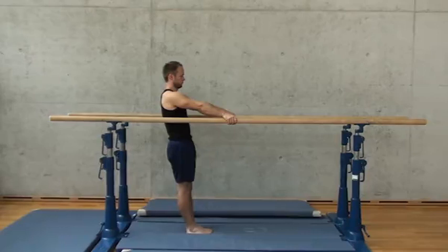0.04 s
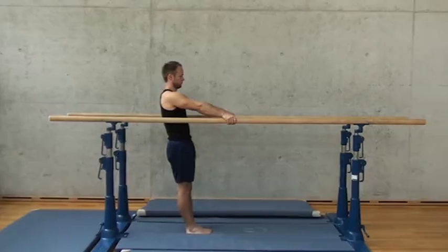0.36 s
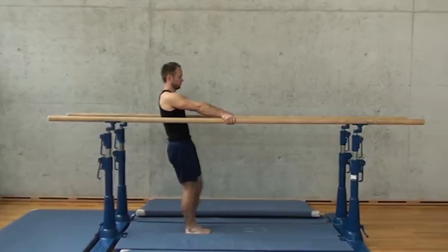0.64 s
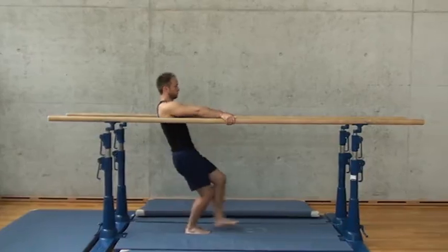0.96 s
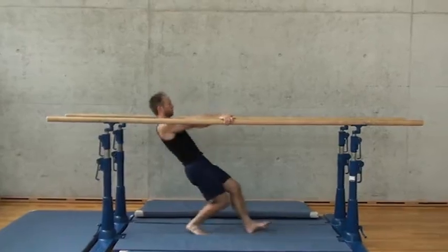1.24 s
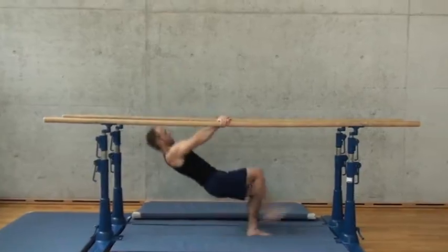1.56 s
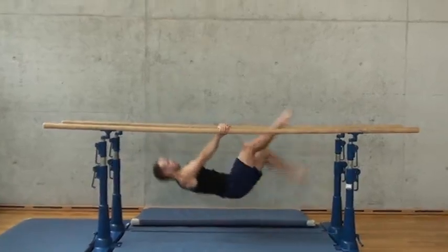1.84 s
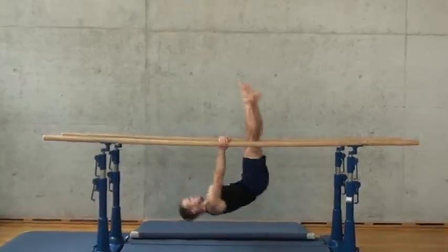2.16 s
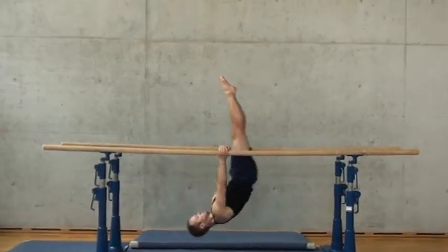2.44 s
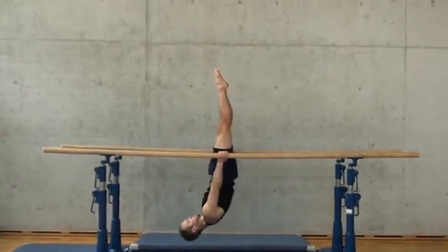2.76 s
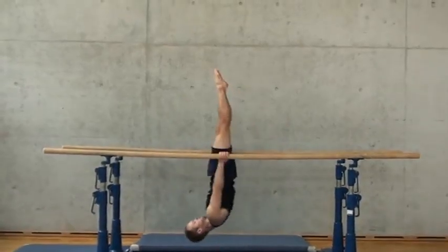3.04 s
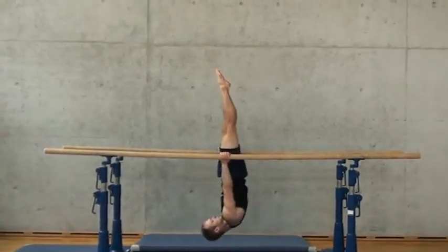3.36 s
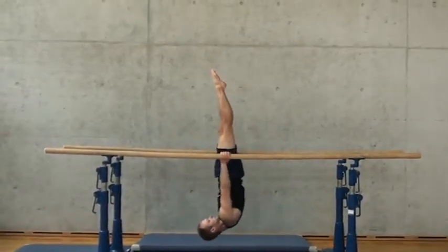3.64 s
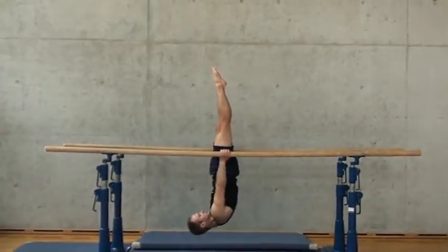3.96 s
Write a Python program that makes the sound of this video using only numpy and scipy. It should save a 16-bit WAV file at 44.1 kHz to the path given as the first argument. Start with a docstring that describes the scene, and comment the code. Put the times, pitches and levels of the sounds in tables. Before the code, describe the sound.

Short thump of a foot on a mat, with a swish and soft knocks.

```python
"""A gymnast swings under wooden parallel bars: a bare foot scuffs and pats the vinyl mat,
then feet and shorts swish as the legs kick up. Rubbing is a hiss with tiny slips in it,
and each pat is a dull thud of foam plus a bright slap of skin, both short bursts of noise.
The mat and the loaded bars knock and rumble softly, and the gym's concrete walls echo.
Behind it all are steady ventilation and a faint electrical whine."""
import sys
import numpy as np
from scipy import signal
from scipy.fft import rfft, irfft, next_fast_len
from scipy.io import wavfile

SR = 44100
rng = np.random.default_rng(int(sys.argv[2]) if len(sys.argv) > 2 else 0)


def store_wav(level_fs):
    """Save 16-bit WAV to argv[1]."""
    pcm = np.round(np.clip(np.atleast_2d(level_fs), -1, 1) * 32767)
    wavfile.write(sys.argv[1], SR, pcm.T.astype(np.int16))


N = 176400

# faint electrical tones: f/Hz, level/dB
WHINE_TONES = [(7876, -90), (14670, -93), (15625, -87)]
# tone colour of the room's air and hiss (how strong each frequency is): f/Hz, level/dB
AIR_COLOUR = [(14, -27), (25, -0.5), (90, -3.5), (187, -5.5), (221, -8.5), (326, -10), (400, -11.5),
              (554, -10), (637, -9), (733, -13), (860, -14), (1280, -18.5), (1390, -19.5), (1510, -20),
              (2200, -22.5), (3200, -26.5), (4500, -30), (6120, -32), (15800, -39.5)]
# how alike the air sounds left and right: f/Hz, likeness (1 = the same)
AIR_ALIKE = [(40, 1), (125, 0.99), (250, 0.87), (600, 0.68), (1000, 0.19), (2000, 0.19), (4000, 0.095),
             (8000, 0.17), (13000, 0.91)]
# pitches at which the air ducts hum: f/Hz, width/Hz, level/dB
DUCT_RESONANCES = [(52.9, 5.4, -69.5), (88.7, 11.3, -65), (324, 3, -67.5), (589.2, 20, -66.5),
                   (633.3, 20, -65), (685, 11.6, -66), (784, 21, -71.5), (1284, 96, -74)]
# how the hum swells and sinks: t/s, level/dB
HUM_SWELL = [(0, -1.5), (1.6, -2.5), (2.05, 4), (2.35, 0.5), (2.7, 0.5), (4, 3.5)]
# time the echo takes to fade by 60 dB: f/Hz, fade/s
ECHO_FADE = [(120, 0.63), (500, 0.82), (2000, 1), (6000, 0.96), (14000, .35)]
# how alike the movements sound left and right: f/Hz, likeness (1 = the same)
NEAR_ALIKE = [(100, 1), (400, 0.99), (1000, 0.91), (3000, 0.83), (8000, 0.82), (14000, 0.25)]
# the frame rumbles as the bars take the weight: peak t/s, rise/s, fall/s, level/dB
RUMBLES = [(1.77, 0.16, 0.17, -51)]
# tone colour of that rumble: f/Hz, level/dB
RUMBLE_COLOUR = [(80, -8), (160, -21), (240, 3), (320, -11.5), (420, -10.5), (900, -23), (3000, -56)]
# dull knocks of the mat and the loaded frame: t/s, f/Hz, width/Hz, level/dB
KNOCKS = [(1.326, 182, 200, -44), (1.388, 84, 50, -44), (1.602, 337, 70, -49), (1.699, 210, 129, -44.5),
          (1.792, 230, 80, -45.5), (1.93, 85, 50, -50), (2.244, 90.5, 35, -46.5)]
# shorts and skin brush as the legs move: peak t/s, rise/s, fall/s, level/dB
SWISHES = [(.775, 0.03, 0.039, -59.5), (.842, 0.034, 0.045, -58.5), (1.23, 0.11, 0.11, -65.5),
           (1.335, 0.015, .04, -62.5), (1.706, 0.078, 0.1, -52.5), (1.795, 0.055, 0.097, -57),
           (2.51, 0.039, 0.035, -70), (3.35, 0.043, 0.024, -66), (3.91, 0.1, 0.048, -63.5)]
# tone colour of that brushing: f/Hz, level/dB
SWISH_COLOUR = [(200, -36), (700, 11), (1300, 5.5), (2100, 6.5), (3000, 0.5), (4200, 0), (6000, -1.5),
                (9000, -3.5), (12000, -9.5), (15500, -31)]
# soles slide on vinyl: peak t/s, rise/s, fall/s, level/dB
SCUFFS = [(1.44, 0.024, 0.021, -47.5), (1.488, 0.018, 0.038, -50.5), (1.53, 0.21, 0.15, -52)]
# tone colour of that sliding: f/Hz, level/dB
SCUFF_COLOUR = [(120, 6), (200, 17.5), (320, 19), (400, 18.5), (500, 16.5), (680, 7), (900, 5), (2000, 2.5),
                (4000, 0), (6200, 0.5), (8500, -3), (11000, -8), (15500, -18)]
# the foot pats the mat: t/s, thud level/dB, thud f/Hz, slap level/dB
PATS = [(1.4487, -40.5, 160, -44), (1.483, -43.5, 327, -54.5)]
# tone colour of the foam's thud: f/Hz, level/dB
THUD_COLOUR = [(60, -10), (130, 4), (250, 4), (380, 2.5), (490, 0), (660, 3), (800, -7.5), (1000, -10),
               (1500, -20), (4000, -60)]
# tone colour of the skin's slap: f/Hz, level/dB
SLAP_COLOUR = [(300, -8), (1000, 4.5), (2000, 0), (3000, 3), (4300, -3), (6300, 3), (9000, -4), (12000, -7),
               (15500, -14)]


def amp(db):
    """Turn decibels into a number to multiply by."""
    return 10 ** (np.asarray(db) / 20)


def unit(x):
    """Scale a sound to an average (rms) level of 1."""
    return x / np.sqrt(np.mean(x ** 2) + 1e-20)


def along(points, hz):
    """Read between the rows of a frequency table, on a log scale."""
    freqs, values = np.transpose(points)
    return np.interp(np.log(hz + 1), np.log(freqs + 1), values)


def clock():
    """The time of every sample, in seconds."""
    return np.arange(N) / SR


def filtered(x, gain):
    """Turn each frequency of x up or down by gain(hz)."""
    size = next_fast_len(N + 8192)
    return irfft(rfft(x, size) * gain(np.fft.rfftfreq(size, 1 / SR)), size)[..., :N]


def white():
    """Two unrelated plain hisses."""
    return rng.standard_normal((2, N))


def stereo(pair, gain, alike):
    """Colour two unrelated sounds and blend them into left and right, at level 1."""
    def blend(hz):
        angle = np.arccos(np.clip(along(alike, hz), -1, 1)) / 2
        return gain(hz) * np.array([np.cos(angle), np.sin(angle)])
    mid, side = filtered(pair, blend)
    return unit(np.array([mid + side, mid - side]))


def coloured(pair, colour, alike=NEAR_ALIKE):
    """Stereo sound shaped by a tone colour table."""
    return stereo(pair, lambda hz: amp(along(colour, hz)), alike)


def band(hz, centre, width):
    """A resonance: strong at its centre, weak to either side."""
    return 1 / (1 + (2 * (hz - centre) / width) ** 2)


def blow(start, rise_s, fade_s, hold_s=0):
    """Loudness of a soft hit: it rises, holds, then drops 60 dB every fade_s."""
    t = clock() - start
    attack = np.clip(t / rise_s + .5, 0, 1)
    fading_for = np.maximum(t - rise_s / 2 - hold_s, 0)
    return attack * np.exp(-np.log(1000) * fading_for / fade_s)


def strokes(rows):
    """Loudness of movements that each swell to a peak and fade."""
    t = clock()
    power = np.zeros(N)
    for peak, rise, fall, db in rows:
        from_peak = np.where(t < peak, (peak - t) / rise, (t - peak) / fall)
        power += (amp(db) * np.exp(-from_peak ** 1.13)) ** 2
    return np.sqrt(power)


def friction(colour, slips_per_s=1500, slip_share=0.21):
    """Rubbing surfaces make tiny random slips over a smooth hiss."""
    slips = white() * (rng.random(N) < slips_per_s / SR)
    rub = np.sqrt(slip_share) * unit(slips) + np.sqrt(1 - slip_share) * white()
    return coloured(rub, colour)


def whine():
    """Electronics give off thin steady tones, the same left and right."""
    return sum(np.sqrt(2) * amp(db) * np.sin(2 * np.pi * hz * clock()) for hz, db in WHINE_TONES)


def ventilation(air_db=-49, fall_db_per_s=0.3946):
    """Moving air hisses, slowly easing a little, and the ducts hum at their own pitches."""
    def ducts(hz):
        return sum(amp(db) / np.sqrt(width) * band(hz, pitch, width)
                   for pitch, width, db in DUCT_RESONANCES)
    hum = stereo(white(), ducts, alike=[(100, 0.99), (600, 0.95)])
    hum_level = np.sqrt(sum(amp(db) ** 2 for _, _, db in DUCT_RESONANCES))
    swell = amp(np.interp(clock(), *np.transpose(HUM_SWELL)))
    air = amp(air_db - fall_db_per_s * clock()) * coloured(white(), AIR_COLOUR, AIR_ALIKE)
    return air + hum_level * swell * hum


def with_echo(x, echo_db, build_s=0.031):
    """Concrete walls add a one-second wash of echoes whose highest notes die first."""
    hz, t, spectrum = signal.stft(white(), SR, nperseg=256)
    fade = np.exp(-np.log(1000) * t / along(ECHO_FADE, hz)[:, None])
    tail = signal.istft(spectrum * fade, SR, nperseg=256)[1][:, :N]
    tail *= np.clip(clock() / build_s, 0, 1)
    tail = stereo(tail, np.ones_like, NEAR_ALIKE)[:, :SR]
    tail /= np.linalg.norm(tail[0])
    return x + amp(echo_db) * signal.fftconvolve(x, tail, axes=1)[:, :N]


def knocks():
    """The mat and the bars' frame take the weight: dull knocks over a low rumble."""
    sound = strokes(RUMBLES) * coloured(white(), RUMBLE_COLOUR)
    for start, pitch, width, db in KNOCKS:
        body = stereo(white(), lambda hz: band(hz, pitch, width), NEAR_ALIKE)
        sound += amp(db) * blow(start, rise_s=0.0092, fade_s=0.2) * body
    return sound


def leg_swishes():
    """Shorts and skin brush together as the legs swing."""
    return strokes(SWISHES) * friction(SWISH_COLOUR)


def foot_scuffs():
    """A bare sole slides over the vinyl."""
    return strokes(SCUFFS) * friction(SCUFF_COLOUR)


def foot_thuds(boost_db=2.5, lead_s=0.002):
    """The foot lands twice, and the mat's foam thuds, a little stronger around one pitch."""
    sound = np.zeros((2, N))
    for start, db, pitch, _ in PATS:
        def colour(hz):
            return amp(along(THUD_COLOUR, hz) + boost_db * band(hz, pitch, width=0.76 * pitch))
        foam = stereo(white(), colour, NEAR_ALIKE)
        sound += amp(db) * blow(start - lead_s, rise_s=0.017, fade_s=0.089, hold_s=0.0096) * foam
    return sound


def foot_slaps():
    """At each landing, bare skin smacks the vinyl cover."""
    loudness = sum(amp(db) * blow(start, rise_s=0.0037, fade_s=0.13) for start, _, _, db in PATS)
    return loudness * friction(SLAP_COLOUR)


def scene():
    """The gymnast's dull and bright sounds echo in the gym, over the steady background."""
    thuds = foot_thuds()
    bright = foot_slaps() + foot_scuffs() + leg_swishes()
    background = ventilation() + whine()
    dull = thuds + knocks()
    return background + with_echo(dull, echo_db=-6) + with_echo(bright, echo_db=-5.5)


def record(dry, start_s=0.046, fade_in_s=0.02, top_hz=15750):
    """Fade in quickly after a moment of silence and cut the very highest treble."""
    fade_in = np.clip((clock() - start_s) / fade_in_s + .5, 0, 1) ** 2
    return filtered(dry * fade_in, lambda hz: hz < top_hz)


dry = scene()
out = record(dry)
store_wav(out)
```